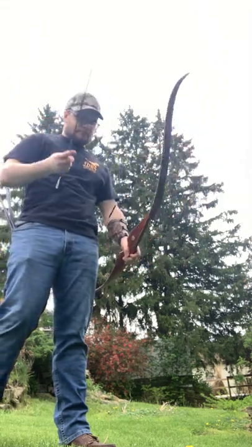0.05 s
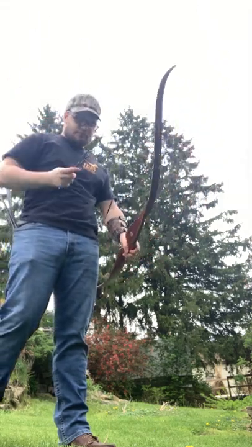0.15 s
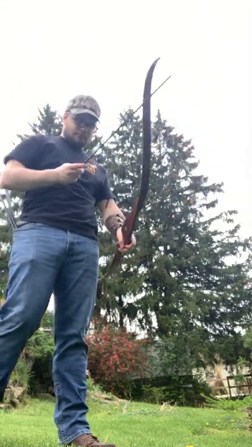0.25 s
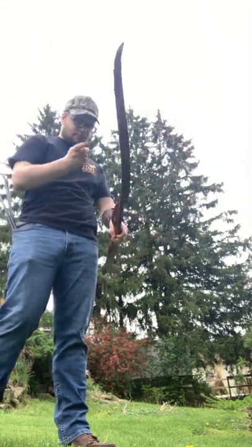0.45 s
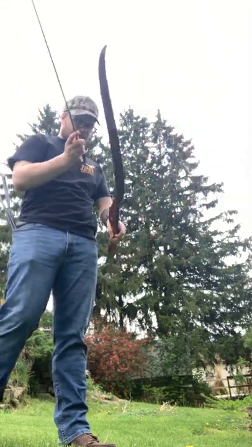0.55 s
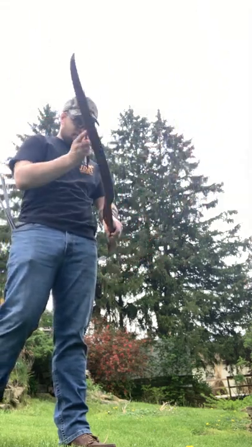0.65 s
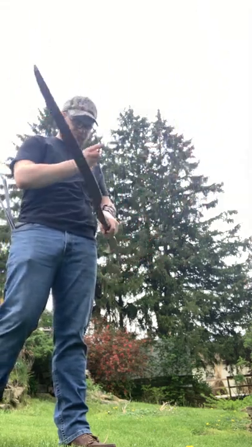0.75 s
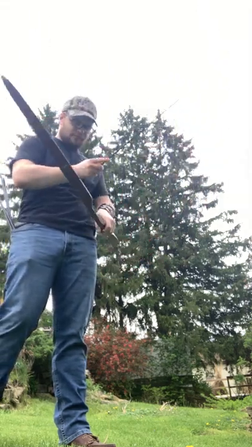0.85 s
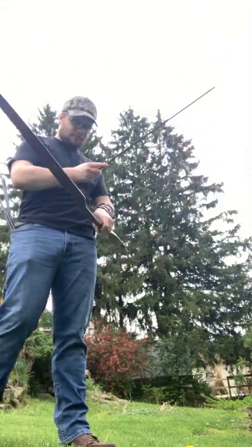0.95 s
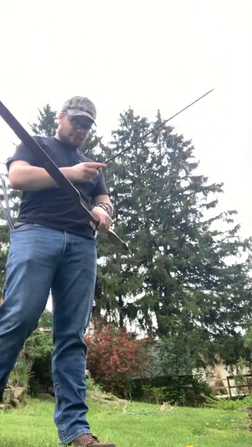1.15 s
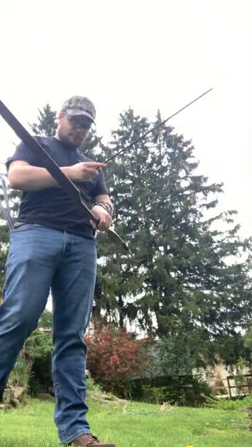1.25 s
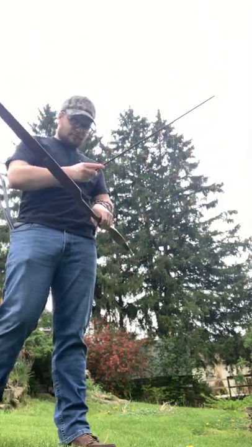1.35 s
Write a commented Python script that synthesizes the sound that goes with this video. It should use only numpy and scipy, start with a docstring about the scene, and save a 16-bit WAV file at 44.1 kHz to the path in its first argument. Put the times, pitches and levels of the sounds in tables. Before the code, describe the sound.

Two crisp, briefly ringing clacks of an arrow meeting a wooden bow come first, with soft shaft and sleeve friction and a few fading ticks. Outdoors on a lawn, faint birds chirp over a low rumble and a far engine.

```python
"""A lawn. An archer lays an arrow against a wooden bow: two sharp knocks, each a crack plus ringing modes,
then light ticks as the shaft settles, all with a faint garden echo. Shaft and sleeve slide with soft
friction noise. Birds call in the trees and a far engine drones over outdoor rumble and hush.
Two faint, steady high tones sound near 4 kHz. Two closely spaced microphone ports pick it all up."""
import sys
import numpy as np
from scipy import signal
from scipy.fft import rfft, irfft, next_fast_len
from scipy.io import wavfile

SR = 44100
rng = np.random.default_rng(int(sys.argv[2]) if len(sys.argv) > 2 else 0)


def persist_wave(psi):
    """Save psi, clipped to +-1, as 16-bit WAV."""
    counts = np.round(np.clip(psi, -1, 1) * 32767).astype(np.int16)
    wavfile.write(sys.argv[1], SR, np.atleast_2d(counts).T)


N = 61739

# Spectrum of the shaft's sliding and ticking. Each row: frequency in Hz, gain in dB.
SHAFT_COLOUR = [(100, -28), (1200, -8.5), (2500, -3.5), (4200, 0.5), (6000, 4), (8000, -2.5), (10800, -5),
                (12500, -15), (14700, -19), (16500, -37.5)]
# Bird calls and, at HIGH_TONE_STARTS_S, two steady high tones.
# Each row: start in seconds, length in seconds, peak in dB, then start, middle and end pitch in Hz.
NOTES = [(0.079, 0.064, -58.5, 2154, 2547, 2810), (0.343, 0.062, -62, 2298, 2166, 2070),
         (0.577, 0.051, -56, 3030, 3334, 3346), (0.614, 0.039, -55.5, 3406, 3106, 2745),
         (0.657, 0.028, -58, 2824, 2680, 2000), (0.721, 0.0335, -61, 2224, 2366, 2430),
         (0.773, 0.053, -63, 2170, 2170, 2270), (.77, .1, -76.5, 9250, 8950, 8520),
         (0.958, 0.036, -67, 4060, 4050, 4030), (1.091, 0.11, -58.5, 4030, 4020, 3950),
         (1.155, 0.0266, -56, 2768, 2628, 2400), (1.177, .045, -64.5, 2520, 2575, 2555),
         (1.255, 0.056, -57, 3715, 3336, 3060), (1.293, .17, -60.5, 3133, 3098, 3200),
         (1.311, 0.029, -55.5, 2820, 2540, 2310)]
HIGH_TONE_STARTS_S = (0.958, 1.091)


def amp(db):
    return 10 ** (np.asarray(db) / 20)


def unit_rms(x):
    return x / np.sqrt(np.mean(x ** 2) + 1e-20)


def lookup(table, hz, column=1):
    """One table column, interpolated over log frequency."""
    rows = np.array(table)
    return np.interp(np.log(hz + 1), np.log(rows[:, 0] + 1), rows[:, column])


def envelope(table, column=1):
    """Gain over time from rows of seconds and dB."""
    rows = np.array(table)
    return amp(np.interp(np.arange(N) / SR, rows[:, 0], rows[:, column]))


def wander(time_s):
    """Smooth random curve, RMS 1, changing over about time_s."""
    size = next_fast_len(N)
    hz = np.fft.rfftfreq(size, 1 / SR)
    spectrum = rfft(rng.standard_normal(size)) / (1 + (hz * time_s * 2) ** 4)
    return unit_rms(irfft(spectrum, size)[:N])


def min_phase(x, gain_db):
    """Minimum-phase filter, one gain per frequency bin."""
    size = len(x)
    cepstrum = irfft(gain_db * np.log(10) / 20, size)
    cepstrum *= 1 + np.sign(size / 2 - np.arange(size))
    cepstrum[0] /= 2
    return irfft(rfft(x) * np.exp(rfft(cepstrum)), size)


def colour(x, table, column=1):
    """Filters by a spectrum table."""
    return min_phase(x, lookup(table, np.fft.rfftfreq(len(x), 1 / SR), column))


def decaying_noise(t60_table, column=1):
    """Half a second of noise, each frequency with its own T60."""
    hz, t, bins = signal.stft(rng.standard_normal(SR // 2), SR, nperseg=128)
    decay = amp(-60 * t / lookup(t60_table, hz, column)[:, None])
    return signal.istft(bins * decay, SR, nperseg=128)[1][:SR // 2]


def add(mix, start_s, sound):
    part = mix[max(round(start_s * SR), 0):][:len(sound)]
    part += sound[:len(part)]


def air(gain_db=-53.5):
    """Outdoor rumble and hush; the bass is alike at both ports."""
    # Each row: frequency in Hz, relative level in dB.
    spectrum = [(20, -20.5), (35, -12.5), (55, 5.5), (80, -0.5), (130, -3.5), (220, -7), (330, -12),
                (500, -18.5), (800, -24.5), (1250, -23), (1850, -38), (2450, -33.5), (2780, -27),
                (3300, -34), (4000, -50), (5200, -45.5), (6200, -62.5), (11000, -56), (16000, -69)]
    # Each row: time in seconds, gain in dB.
    swell = [(0, 0), (.35, 3.5), (.7, 1.5), (1, 2), (1.27, 4), (1.4, 2.5)]
    # Each row: frequency in Hz, left-right correlation.
    coherence = [(30, .999), (70, .998), (120, .985), (300, .88), (800, .7), (2000, .5), (5000, .7),
                 (16000, .7)]
    hz = np.fft.rfftfreq(N, 1 / SR)
    alike = lookup(coherence, hz)
    left, independent = rfft(rng.standard_normal((2, N)))
    right = alike * left + np.sqrt(1 - alike ** 2) * independent
    noise = irfft(np.array([left, right]) * amp(lookup(spectrum, hz)), N)
    return amp(gain_db) * envelope(swell) * unit_rms(noise)


def engine(waver_depth=0.004, flutter_db=1.2):
    """Wavering low tones of a far engine; the strongest swells on its own."""
    # Each row: frequency in Hz, level in dB before the swell.
    tones = [(61, -61.5), (118.4, -49), (148, -61), (199.2, -61), (236.9, -55.5), (299, -64.5),
             (355.3, -71), (484.5, -76.5)]
    # Each row: time in seconds, gain of the strongest tone in dB, gain of the others in dB.
    swell = [(0, -2, -5), (.1, -0.5, -2.5), (.45, 2.5, -2.5), (0.649, -2, 0), (0.779, -3.5, -2),
             (.92, -5.5, -7), (1, -7.5, -0.5), (1.12, -1.5, 0.5), (1.4, -2, 1.5)]
    strongest_db = max(db for hz, db in tones)
    out = np.zeros(N)
    for hz, db in tones:
        cycles = np.cumsum(hz * (1 + waver_depth * wander(0.08))) / SR + rng.random()
        tone = amp(db + flutter_db * wander(0.1445)) * np.sqrt(2) * np.sin(2 * np.pi * cycles)
        out += tone * envelope(swell, column=1 if db == strongest_db else 2)
    return out


def slide(grain_db=1, grain_s=0.0092):
    """Grainy friction of sliding shaft and rustling sleeve."""
    # Each row: time in seconds, level in dB.
    levels = [(0, -66), (.06, -72.5), (.17, -71), (.2, -49.5), (.25, -48.5), (.29, -54), (.33, -56.5),
              (.38, -65.5), (.41, -61.5), (.46, -53.5), (.51, -64.5), (.62, -75.5), (.8, -78), (1.1, -81),
              (1.22, -85), (1.4, -81.5)]
    grain = unit_rms(amp(grain_db * wander(grain_s)))
    friction = unit_rms(colour(rng.standard_normal(N), SHAFT_COLOUR))
    return envelope(levels) * grain * friction


def sine_notes(rows, waver_depth=0.011, scatter_rad=0.22, echo_t60_s=0.43, echo_db=-2.5):
    """Slightly rough sine notes with an echo."""
    direct = np.zeros(N)
    for start_s, length_s, db, *pitch_hz in rows:
        progress = np.linspace(0, 1, int(length_s * SR))
        waver = waver_depth * wander(0.004)[:len(progress)]
        scatter = scatter_rad * wander(0.0033)[:len(progress)]
        hz = np.polyval(np.polyfit([0, 0.5, 1], pitch_hz, 2), progress)
        tone = np.sin(2 * np.pi * np.cumsum(hz * (1 + waver)) / SR + scatter)
        add(direct, start_s, amp(db) * np.sin(np.pi * progress) * tone)
    t = np.arange(SR // 2) / SR
    tail = rng.standard_normal(len(t)) * amp(-60 * t / echo_t60_s)
    return direct + amp(echo_db) * signal.fftconvolve(direct, tail / np.linalg.norm(tail))[:N]


def birds():
    """Bird calls, roughened and smeared by the trees."""
    return sine_notes(row for row in NOTES if row[0] not in HIGH_TONE_STARTS_S)


def crack(spot, snap_db=5.5, snap_s=0.00046):
    """Bright burst of one contact, with extra force in its first instant."""
    # Each row: frequency in Hz, gain in dB at spots 0 and 1.
    spectrum = [(200.4, -24, -28), (700, -28, -22), (1330, -17, -15), (2000, -2.5, 0.5), (4220, 6, 1.5),
                (6450, -1.5, 0), (7500, -1, 0.5), (10970, 2.5, 3), (12900, -4.5, -14), (15600, -6, -15),
                (16580, -32, -40.5)]
    # Each row: frequency in Hz, T60 in seconds at spots 0 and 1.
    decay = [(300, 0.066, 0.072), (1200, 0.02, 0.024), (2510, 0.041, 0.045), (5004, .022, 0.039),
             (9000, 0.027, 0.011), (15000, 0.02, 0.013)]
    burst = decaying_noise(decay, column=1 + spot)
    t = np.arange(len(burst)) / SR
    snap = 1 + amp(snap_db) * np.exp(-t / snap_s)
    return colour(burst * snap, spectrum, column=1 + spot)


def ring(spot, rise_cycles=1.6):
    """Modes of bow and arrow struck at one spot; low modes build up more slowly."""
    # Each row: frequency in Hz, T60 in seconds, gain in dB at spots 0, 1 (knocks) and 2 (rattle).
    modes = [(427, 0.17, -32, -23, -33), (485, .15, -31, -28, -33), (530, 0.14, -29, -36, -22),
             (630, 0.18, -38, -26, -40), (754, 0.47, -49, -31, -50), (778, 0.14, -26, -36, -35),
             (883, 0.16, -48, -36, -44), (1046, 0.13, -27, -37, -39), (1083, 0.24, -45, -30, -44),
             (1190, 0.13, -35, -26, -34), (1338, 0.15, -30, -38, -24), (1384, 0.16, -33, -33, -24),
             (1755, 0.09, -20, -32, -28), (1848, 0.17, -32, -25, -34), (1914, 0.07, -15, -14, -22),
             (1985, 0.06, -9, -19, -19), (2184, 0.06, -9, -23, -22), (2312, 0.07, -12, -16, -28),
             (2346, 0.045, -14, -12, -26), (2455, .035, -16, -10, -24), (2790, 0.045, -19, -17, -22),
             (2938, 0.07, -23, -18, -15), (2972, 0.06, -7, -23, -15), (3415, 0.07, -18, -19, -14),
             (3660, .03, -12, -9, -20), (3800, .05, -14, -18, -16), (3965, 0.026, -7, 1, -20),
             (4480, 0.026, -7, -4, -16), (4830, .028, -7, -11, -22), (5080, 0.025, -3, -6, -20),
             (5450, 0.025, -3, -11, -18), (5940, 0.032, -5, -13, -18), (6245, 0.034, -6, -16, -18),
             (6440, 0.032, -6, -21, -18), (6750, 0.018, -20, -7, -20), (7378, 0.027, -7, -26, -20),
             (7670, 0.02, -11, -10, -20), (7955, 0.021, 0, -11, -18), (8318, 0.021, -21, -4, -22),
             (9025, 0.018, -21, -7, -22), (9400, 0.022, -7, -13, -22), (9700, 0.026, -5, -31, -22),
             (10125, 0.017, -21, -6, -24), (10592, 0.021, 1, -20, -20), (11160, 0.02, -5, -20, -26),
             (12220, 0.017, -3, -22, -30)]
    t = np.arange(SR // 2) / SR
    out = np.zeros(len(t))
    for hz, t60_s, *spot_db in modes:
        rise = 1 - np.exp(-t * hz / rise_cycles)
        decay = amp(spot_db[spot] - 60 * t / t60_s)
        out += rise * decay * np.sin(2 * np.pi * (hz * t + rng.random()))
    return 0.5 * out


def rebound(spot, db_per_octave, knee_hz=2520):
    """Softer second contact: a crack with its treble sloped above the knee."""
    burst = crack(spot)
    hz = np.fft.rfftfreq(len(burst), 1 / SR)
    return min_phase(burst, db_per_octave * np.log2(np.maximum(hz / knee_hz, 1)))


def knocks(touch_lead_s=0.0013):
    """Arrow meets bow: a thin first touch, the ringing blow, a rebound."""
    # Each row: start in seconds, crack gain in dB, ring gain in dB, spot on the bow, touch gain in dB,
    # then the rebound's delay in seconds, gain in dB and treble slope in dB per octave.
    blows = [(0.2108, -18, -10.5, 0, -20, 0.0053, -24.5, 0),
             (0.4231, -21.5, -10.5, 1, -29, .0027, -19.5, -15.5)]
    # Thinning of the first touch. Each row: frequency in Hz, gain in dB.
    touch_colour = [(500, -20.5), (2500, -9.5), (5500, -3.5), (9000, -0.5), (15000, -1.5)]
    out = np.zeros(N)
    for start_s, crack_db, ring_db, spot, touch_db, delay_s, rebound_db, db_per_octave in blows:
        touch = colour(crack(spot), touch_colour)[:SR // 4]
        add(out, start_s - touch_lead_s, amp(touch_db) * touch)
        add(out, start_s, amp(crack_db) * crack(spot) + amp(ring_db) * ring(spot))
        add(out, start_s + delay_s, amp(rebound_db) * rebound(spot, db_per_octave))
    return out


def garden_echo(direct, ground_s=0.0052, ground_db=-16, side_gain=0.94):
    """Ground reflection plus a faint tail that differs between the ports."""
    # Each row: frequency in Hz, T60 in seconds, gain in dB.
    tail_bands = [(200, .25, -18), (1000, .22, -14), (2516, .22, -23), (4997, 0.088, -21),
                  (8900, 0.16, -34), (15000, .2, -40)]
    noise = np.array([decaying_noise(tail_bands) for _ in range(2)])
    mid, side = noise / np.linalg.norm(noise[0])
    tails = np.array([mid + side_gain * side, mid - side_gain * side])
    echo = signal.fftconvolve(colour(direct, tail_bands, column=2)[None], tails, axes=1)[:, :N]
    ground = np.pad(direct, (round(ground_s * SR), 0))[:N]
    return echo + amp(ground_db) * ground


def rattle(t60_s=0.014):
    """The settling shaft ticks: short bursts of band noise, each with a ring of the modes."""
    # Each row: start in seconds, tick gain in dB, band centre in Hz, width in octaves, ring gain in dB.
    ticks = [(.2385, -38.5, 7150, 0.5, -24), (.2445, -42.5, 7950, 0.55, -34), (0.2598, -29.5, 6300, 1, -22),
             (0.2652, -38.5, 6026, 0.97, -35), (.275, -47, 5500, 0.99, -30),
             (0.326, -47.5, 7400, 0.56, -42), (0.451, -45.5, 7800, 0.25, -55),
             (0.456, -44.5, 7000, 0.64, -54), (0.537, -57, 6480, 0.32, -58), (0.63, -48.5, 4290, 0.35, -63),
             (.732, -63, 7400, 0.71, -72)]
    t = np.arange(SR // 2) / SR
    hz = np.fft.rfftfreq(len(t), 1 / SR)
    out = np.zeros(N)
    for start_s, tick_db, centre_hz, width_oct, ring_db in ticks:
        bell = np.exp(-0.5 * (np.log2((hz + 1) / centre_hz) / width_oct) ** 2)
        band = unit_rms(irfft(rfft(rng.standard_normal(len(t))) * bell, len(t)))
        tick = colour(amp(-60 * t / t60_s) * band, SHAFT_COLOUR)
        add(out, start_s, amp(tick_db) * tick + amp(ring_db) * ring(spot=2))
    return out


def high_tones():
    """Two faint, steady tones near 4 kHz."""
    return sine_notes(row for row in NOTES if row[0] in HIGH_TONE_STARTS_S)


def scene():
    arrow = knocks() + rattle()
    return arrow + garden_echo(arrow) + slide() + birds() + high_tones() + engine() + air()


def record(dry, cutoff_hz=16400):
    """Phase and level offsets between the two ports, then a low-pass."""
    # Each row: frequency in Hz, lag of the left port in radians, left minus right in dB.
    ports = [(20, 0, 0), (120, 0, -1), (280, 0, -2), (800, -.3, 0), (1400, .9, .5), (2300, .7, -1),
             (3000, 1.2, -2), (3500, 2.5, -1), (4400, 3.15, 0), (6000, 4.4, 0), (8500, 6.25, 0),
             (11500, 8.4, 0), (15000, 10.7, 0)]
    size = next_fast_len(N + 4096)
    hz = np.fft.rfftfreq(size, 1 / SR)
    left = np.exp(-0.5j * lookup(ports, hz)) * amp(lookup(ports, hz, column=2) / 2)
    heard = irfft(rfft(dry, size) * np.array([left, 1 / left]), size)[:, :N]
    lowpass = signal.firwin(255, cutoff_hz, window=("kaiser", 9), fs=SR)
    return signal.oaconvolve(heard, lowpass[None], "same")


dry = scene()
out = record(dry)
persist_wave(out)
```